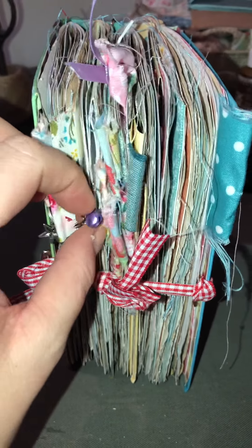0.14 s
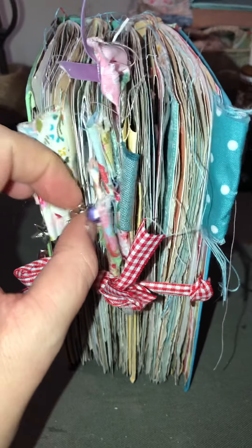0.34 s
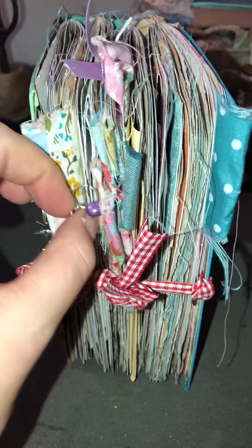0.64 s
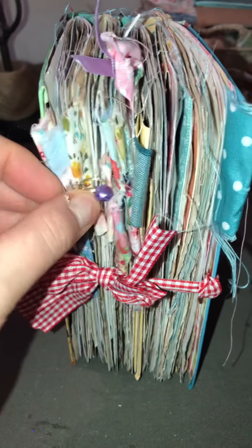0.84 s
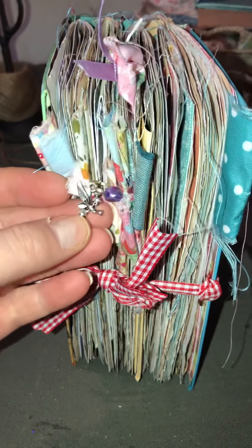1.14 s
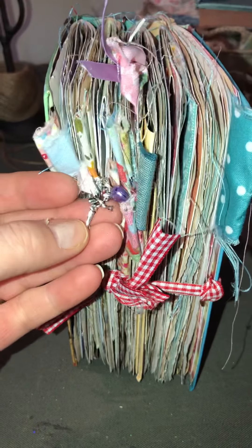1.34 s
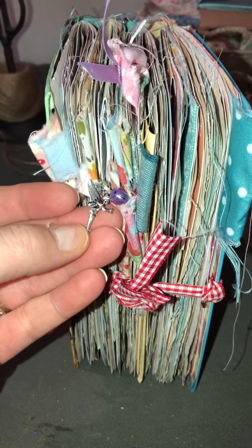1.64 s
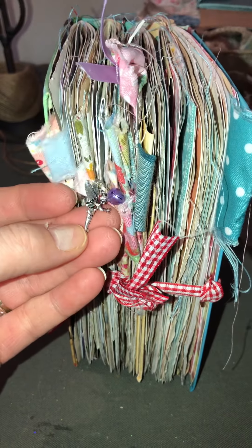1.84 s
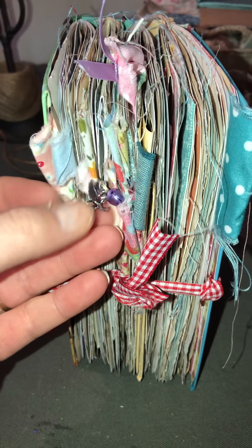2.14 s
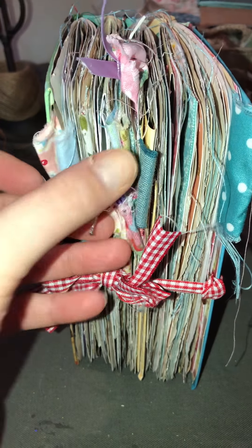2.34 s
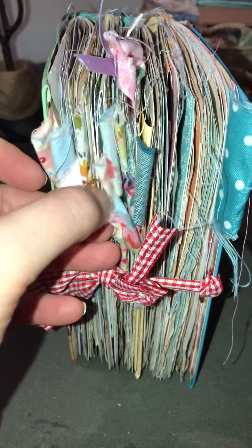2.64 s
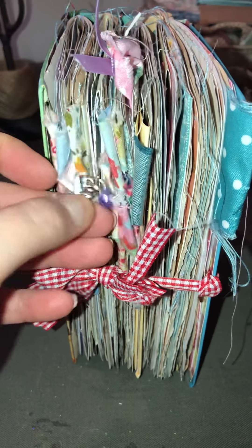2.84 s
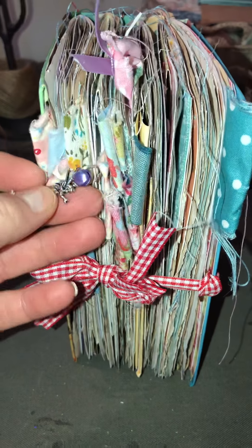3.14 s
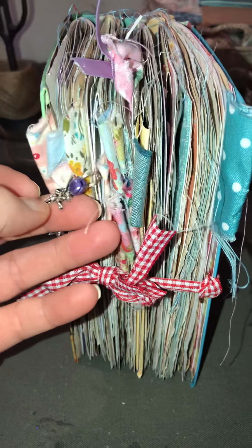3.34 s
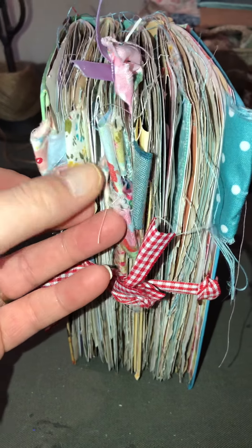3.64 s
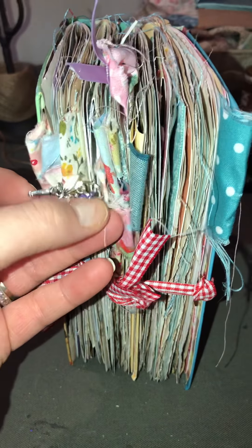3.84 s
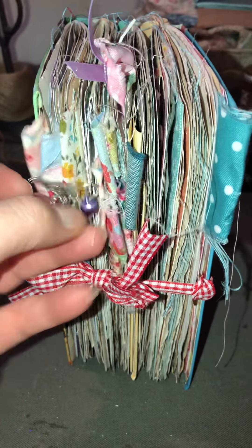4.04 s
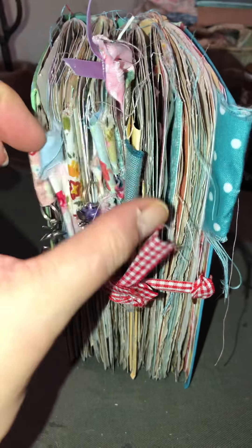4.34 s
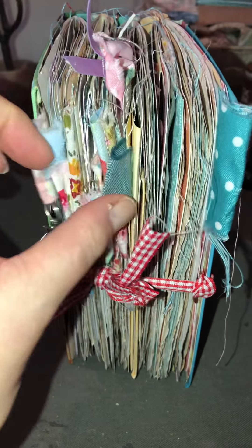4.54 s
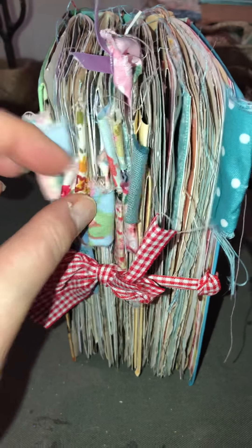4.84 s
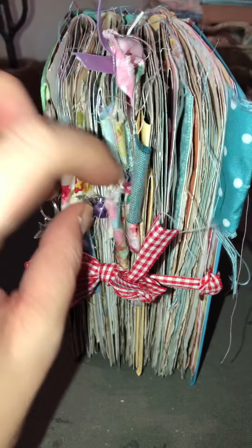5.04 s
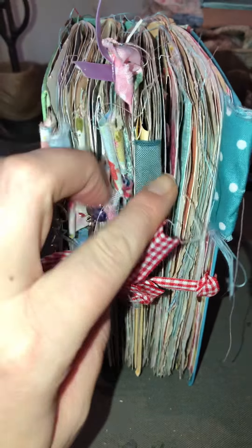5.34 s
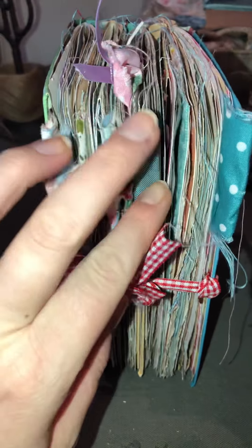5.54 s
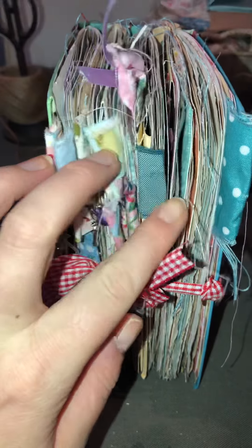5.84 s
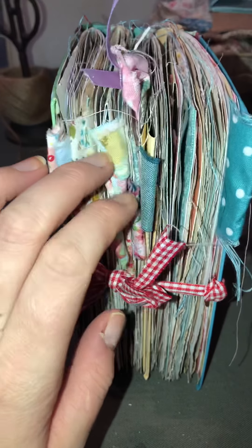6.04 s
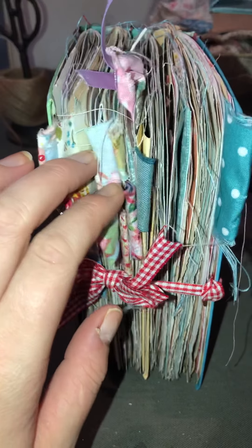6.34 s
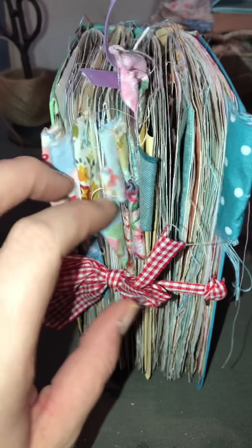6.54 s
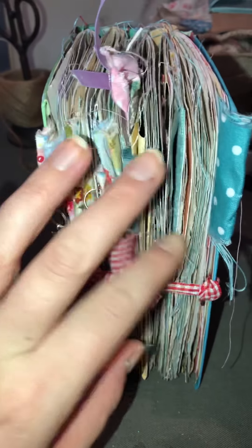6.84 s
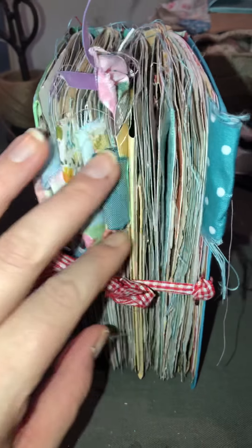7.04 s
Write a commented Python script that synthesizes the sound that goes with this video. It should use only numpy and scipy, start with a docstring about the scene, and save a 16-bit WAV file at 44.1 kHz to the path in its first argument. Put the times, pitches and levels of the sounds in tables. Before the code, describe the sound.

Very high, short, dry metallic ticks from a pellet in a tiny bell, clustered irregularly, mixed with small nail and charm taps and soft grainy rubbing of fabric and paper. Busiest in the middle, sparse towards the end, where finger strokes and bumps on thick pages take over. Close microphone, small dry indoor space, low room hum, faint steady whine, a brief low drone near the end.

```python
"""Fingers handle a tiny jingle bell and metal charms tied to the cloth tabs of a thick paper journal.
From the start a quiet room hums and an appliance whines faintly (noise and wavering sines), and fingertips
rustle on cloth and paper (grainy noise). At 0.2 s the pellet starts ticking in the bell (short damped sines),
then nails and charms tap (sines falling in pitch, with a crack). A nail slides along a ribbon near 2.2 s,
the bell is busiest from 2.6 to 4.4 s, soft pushes on the pages start at 4.4 s, and a low drone swells at 6.2 s.
"""
import sys
import numpy as np
from scipy import signal
from scipy.fft import rfft, irfft, next_fast_len
from scipy.io import wavfile
from scipy.ndimage import uniform_filter1d, map_coordinates

SR = 44100
rng = np.random.default_rng(int(sys.argv[2]) if len(sys.argv) > 2 else 0)


def digitize_waveform(pressure):
    """Quantize a signal to 16-bit integers and store it at the path in sys.argv[1].

    Rows of a 2-D input are taken as channels; values are limited to [-1, 1].
    """
    field = np.atleast_2d(pressure).T
    bounded = np.clip(field, -1, 1)
    quanta = np.round(bounded * 32767).astype(np.int16)
    wavfile.write(sys.argv[1], SR, quanta)


N = 316638  # length in samples, about 7.2 s

# Tone colour of the room's air noise: (pitch [Hz], relative level [dB])
AIR_COLOUR = [(18, -36.5), (38, -5.5), (85, -4), (140, 0), (223, 0.5), (302, -2.5), (360, -5), (836, -12.5),
              (1340, -17), (2740, -26.5), (8700, -28.5), (9050, -22.5), (9400, -35.5), (16000, -29)]
AIR_DB = -66.5  # rms level, before a slight wobble
# Steady hum and whine: (pitch [Hz], rms level [dB], depth of waver [dB])
HUM_TONES = [(100, -74, 2.5), (161.8, -78, 7), (199.4, -77.5, 6.5), (243.9, -75.5, 1.5), (296.5, -77.5, 3),
             (588.5, -85, 1), (636.7, -71, 0.9), (687, -83, -2)]
# Swell of a low drone near 160 Hz: (time [s], level [dB])
DRONE_SWELL = [(5.75, -80), (5.95, -67), (6.2, -64), (6.45, -66.5), (6.6, -76)]

# Fingertips stroking cloth and paper:
# (loudest time [s], top level of dull part [dB], swell [s], fade [s], bright part against dull part [dB])
FINGER_STROKES = [(.02, -70, .05, 0.074, -6.5), (.181, -76, 0.062, 0.94, 4.5), (.48, -64, 0.034, 0.035, -7),
                  (.527, -67, 0.07, 0.053, -3), (.707, -70, 0.083, .2, 2), (.857, -68, 0.11, 0.59, -1.5),
                  (2.16, -85, 0.019, 0.1, 8), (2.262, -64, 0.076, 0.024, 1), (2.31, -71.5, .05, .15, -6),
                  (2.7, -71.5, 0.4, 0.097, 2), (2.979, -66, 0.22, .08, -4.5), (3.077, -64, 0.036, 0.034, 4),
                  (3.166, -70, 0.081, 0.29, -9), (4.047, -73.5, 0.032, 0.9, -3),
                  (4.21, -73, .1, 0.088, 8.5), (4.243, -60.5, 0.0075, .025, 2), (4.831, -66, 0.16, .03, 3),
                  (5.046, -69, 0.17, 0.046, 2), (5.301, -68, 0.13, 0.55, -1.5),
                  (5.6, -73, 0.21, 0.37, -8.5), (5.8606, -52, 0.0097, .002, 4),
                  (5.892, -67.5, .02, .04, 0.5), (5.914, -71.5, .04, .015, 3), (6.199, -69.5, 0.4, 0.2, -3),
                  (6.483, -58.5, 0.011, .02, 9.5), (6.502, -53, 0.0126, 0.0167, 9),
                  (6.606, -71, 0.28, 0.073, -1.5), (7.17, -71, 0.38, 0.12, -1)]
STROKE_DROP_DB = 15  # how far a stroke lies below its top one swell time before or one fade time after
RESTING_DB = -81  # fingers that merely rest on the cloth
# Tone colour of the dull part of the rubbing: (pitch [Hz], relative level [dB])
DULL_COLOUR = [(300, -15), (600, -3.5), (1500, -3), (3000, -7.5), (4500, -15.5), (7000, -48.5)]
# Tone colour of the bright part of the rubbing: (pitch [Hz], relative level [dB])
BRIGHT_COLOUR = [(2000, -17), (4000, -5), (6000, -3.5), (9000, -6.5), (12000, -7.5), (16000, -14.5)]
# A nail slides along a ribbon: (time [s], level [dB])
RIBBON_SWISH = [(2.17, -97), (2.2, -71), (2.24, -72), (2.268, -82), (2.28, -93)]
SWISH_HZ, SWISH_WIDTH_HZ = 5680, 860

# Pellet strikes in the bell: (time [s], peak level [dB])
PELLET_STRIKES = [(.189, -44.5), (.1978, -50), (0.2089, -18.5), (0.215, -33), (.2435, -27.5),
                  (0.274, -30.5), (.278, -47.5), (.303, -37.5), (.331, -38.5), (.345, -41), (.375, -35.5),
                  (0.3877, -42), (.42, -44), (.427, -43), (0.438, -44.5), (0.4696, -49), (0.498, -54.5),
                  (.6947, -50), (0.7009, -34.5), (0.721, -37), (.7333, -43), (.7516, -47), (.7555, -46),
                  (.7766, -41), (.786, -44), (.818, -47), (0.8756, -35.5), (.8794, -31.5), (0.891, -49),
                  (0.904, -46), (.913, -47), (.9504, -40.5), (1.049, -49), (1.0565, -51), (1.0838, -52),
                  (1.2875, -44), (1.3636, -49.5), (1.3949, -53), (2.607, -52), (2.6224, -30),
                  (2.6649, -44.5), (2.679, -35), (2.6867, -34), (2.702, -35), (2.753, -25.5),
                  (2.7702, -33.5), (2.7833, -34), (2.7902, -22.5), (2.798, -34), (2.8315, -40),
                  (2.8991, -51.5), (2.94, -41), (2.9617, -24.5), (2.9688, -18), (2.975, -40),
                  (2.982, -20.5), (3.0035, -21.5), (3.029, -49.5), (3.037, -41), (3.0437, -40.5),
                  (3.056, -39), (3.0803, -31.5), (3.0836, -34), (3.0917, -38), (3.105, -38.5),
                  (3.1173, -37.5), (3.1556, -28), (3.166, -23.5), (3.18, -27.5), (3.198, -37),
                  (3.2127, -51), (3.27, -53), (3.2832, -42), (3.2943, -42.5), (3.3711, -35), (3.41, -64),
                  (3.436, -54), (3.449, -48), (3.479, -54), (3.5, -64), (3.508, -62.5), (3.6141, -55),
                  (3.733, -44), (3.7358, -46.5), (4.0402, -21.5), (4.0456, -26), (4.049, -24.5),
                  (4.0574, -34), (4.0803, -22), (4.0888, -31.5), (4.098, -34.5), (4.107, -43),
                  (4.1255, -34), (4.1712, -34), (4.1889, -37), (4.206, -30), (4.2183, -19), (4.221, -25.5),
                  (4.232, -33.5), (4.2396, -23), (4.2472, -20), (4.255, -33), (4.2825, -33.5),
                  (4.2935, -35), (4.3123, -30.5), (4.319, -35), (4.3705, -28), (4.3943, -34), (4.474, -52),
                  (4.724, -40), (4.937, -56), (5.049, -29.5), (5.053, -26), (5.0595, -37), (5.0748, -23),
                  (5.1007, -41), (5.139, -43), (5.164, -35), (5.1775, -45), (5.2047, -44.5), (5.218, -52),
                  (5.2496, -51), (6.058, -57), (6.077, -57), (6.263, -38.5), (6.2704, -46), (6.3026, -52),
                  (6.3235, -52), (6.3785, -57), (6.3918, -58), (6.516, -32), (6.5351, -50), (6.5396, -38.5),
                  (6.601, -55)]
# Moments when the bell hangs free and rings on: (start [s], end [s], starting level [dB])
FREE_RINGING = [(0.215, 0.25, -35), (0.241, 0.28, -61), (0.711, 0.72, -48), (0.778, .85, -52),
                (2.768, 2.805, -32.5), (2.8, 2.815, -58), (3.122, 3.155, -50), (4.08, 4.09, -47),
                (4.099, 4.133, -43), (4.22, 4.25, -39), (4.258, 4.276, -46)]
# Shakes that keep the pellet rolling: (start [s], end [s], level at start [dB], level at end [dB])
BELL_SHAKES = [(0.169, 0.51, -66, -76), (0.689, 1.45, -66, -88), (2.159, 2.193, -74, -72),
               (2.6, 3.52, -65, -74.5), (2.903, 2.973, -76, -45.5), (3.6, 3.802, -77.5, -71),
               (4.037, 4.602, -52, -79), (4.713, 4.851, -85, -66), (5.045, 5.296, -70, -79.5),
               (6.256, 6.34, -57, -80)]
SHELL_HZ, SHELL_SPREAD_HZ = 11770, 240  # the shell's pitch, and its random spread from blow to blow
FREE_HZ = 11560  # the mode that outlasts the others
STRIKE_T60_S, BOUNCE_T60_S, CLICK_T60_S = 0.011, 0.014, 0.006  # times to fade by 60 dB
# Small bounces after a strike: level below the loudest strike, dB gained per dB of strike, 60 dB fade
BOUNCE_BELOW_DB, BOUNCE_GROWS, SETTLE_S = -24, 0.88, 0.13

# Taps of nails and charms on cloth and card: (time [s], knock peak [dB], final pitch [Hz], 60 dB fade [s])
HARD_TAPS = [(0.3451, -43.5, 3480, 0.00094), (0.4525, -37.5, 3220, 0.0029), (0.697, -28, 3550, 0.0022),
             (1.2282, -46, 1740, 0.0033), (2.16, -59, 14500, 0.0036), (2.622, -52, 5060, 0.0033),
             (2.758, -51.5, 900, 0.012), (3.0727, -51.5, 2480, 0.004), (3.081, -43.5, 5750, 0.0025),
             (3.157, -52, 4020, 0.0027), (3.167, -47.5, 4500, 0.0019), (3.178, -52, 2480, 0.0026),
             (3.212, -53.5, 1320, 0.0067), (3.3263, -55, 3450, 0.003), (3.371, -52, 5960, 0.0023),
             (3.831, -53.5, 5780, 0.0014), (3.8415, -44.5, 13700, 0.0021), (3.874, -40, 13720, 0.0016),
             (4.014, -52, 13770, 0.0022), (4.043, -35, 5100, 0.0007), (4.044, -54, 1730, .006),
             (4.2408, -49, 1900, .005), (5.047, -40.5, 7140, 0.0022), (5.862, -32, 1110, 0.0072),
             (6.2813, -50.5, 4200, 0.0031), (6.483, -41, 2900, 0.005), (6.498, -44, 3470, 0.0041),
             (6.506, -37.5, 6960, 0.00443), (6.5066, -46, 1380, 0.0051), (6.597, -55, 5940, .003),
             (6.608, -50, 1310, 0.0034)]
CRACK_BELOW, CRACK_ABOVE = 0.6, 4  # edges of the crack's band, as multiples of the tap's pitch
# Soft pushes on the block of pages: (time [s], starting level [dB], pitch [Hz], 60 dB fade [s])
PAGE_PUSHES = [(4.413, -48, 277, 0.077), (4.43, -52, 233, 0.13), (4.455, -64, 253, 0.14),
               (5.866, -43, 284, 0.022), (6.045, -51.5, 278, 0.2), (6.952, -54, 274, 0.15)]

WALLS_DB = -18  # strength of the table's and room's answer
FADE_HZ, TOP_HZ = 15850, 16700  # where the last treble starts to fade, and where it stops


def amp(db):
    """Turns decibels into a gain."""
    return 10 ** (np.asarray(db) / 20)


def unit(x):
    """Scales a sound to rms 1."""
    return x / np.sqrt(np.mean(x ** 2) + 1e-20)


def curve(rows, column=1):
    """Draws one table column as a value per sample; silent outside the rows."""
    rows = np.array(rows)
    return np.interp(np.arange(N) / SR, rows[:, 0], rows[:, column], left=-150, right=-150)


def wobble(rate):
    """A smooth random curve through a given number of random points a second."""
    points = rng.standard_normal(int(N * rate / SR) + 4)
    return map_coordinates(points, [np.arange(N) * rate / SR])


def filtered(x, response):
    """Changes the strength of each frequency in x by a response curve."""
    m = next_fast_len(N + 8192)
    return irfft(rfft(x, m) * response(np.fft.rfftfreq(m, 1 / SR)), m)[:N]


def coloured(x, spectrum):
    """Gives x the tone colour of a (Hz, dB) table, at rms 1."""
    f, db = np.transpose(spectrum)
    return unit(filtered(x, lambda hz: amp(np.interp(np.log(hz + 1), np.log(f + 1), db))))


def ring(t, hz, t60, attack):
    """A sine that starts softly and fades by 60 dB in t60 seconds, as a struck object does."""
    return np.sin(2 * np.pi * hz * t) * amp(-60 * t / t60) * (1 - np.exp(-t / attack))


def add(track, s, sound):
    """Mixes a sound into the track at time s."""
    part = track[round(s * SR):][:len(sound)]
    part += sound[:len(part)]


def wavering_tone(hz, waver_db):
    """A sine whose level and phase drift at random, at rms 1."""
    t = np.arange(N) / SR
    level = amp(waver_db * wobble(13))
    return unit(level * np.sin(2 * np.pi * hz * t + 0.16 * waver_db * wobble(12)))


def room():
    """Air noise, wavering hum and whine lines, and a passing low drone."""
    air = amp(AIR_DB + 1.1 * wobble(2.71)) * coloured(rng.standard_normal(N), AIR_COLOUR)
    hum = sum(amp(db) * wavering_tone(hz, waver_db) for hz, db, waver_db in HUM_TONES)
    drone = amp(curve(DRONE_SWELL)) * wavering_tone(160, 1.3)
    return air + hum + drone


def distance_from_peak(s, rise, fall):
    """How far a swell is from its top at time s: 1 one rise time before it, 1 one fall time after."""
    t = np.arange(N) / SR - s
    return np.maximum(-t / rise, t / fall)


def fingers():
    """Friction: grainy noise as fibres catch and let go; a dull part, a bright part and a narrow swish."""
    grains = amp(1.2 * wobble(40) + 2.24 * wobble(500)) * rng.standard_normal(N)
    swish = unit(filtered(grains, lambda hz: 1 / (1 + (2 * (hz - SWISH_HZ) / SWISH_WIDTH_HZ) ** 2)))
    # Strokes overlap, so their powers are summed
    dull_power = amp(RESTING_DB) ** 2
    bright_power = amp(RESTING_DB) ** 2
    for s, db, rise, fall, brightness_db in FINGER_STROKES:
        power = amp(db - STROKE_DROP_DB * distance_from_peak(s, rise, fall)) ** 2
        dull_power = dull_power + power
        bright_power = bright_power + power * amp(brightness_db) ** 2
    dull = np.sqrt(dull_power) * coloured(grains, DULL_COLOUR)
    bright = np.sqrt(bright_power) * coloured(grains, BRIGHT_COLOUR)
    return dull + bright + amp(curve(RIBBON_SWISH)) * swish


def strike(db, hz, t60):
    """One pellet blow: two close shell modes beat against each other, with side modes and a click."""
    t = np.arange(SR // 40) / SR
    luck = rng.standard_normal(6)
    # The cosine splits the pitch into a close pair, about 75 Hz to either side
    body = ring(t, hz, t60, 0.00013) * np.cos(2 * np.pi * 75 * amp(0.99 * luck[5]) * t)
    body += amp(-15.5 + 2.8 * luck[0]) * ring(t, hz * (1.125 + 0.026 * luck[1]), 0.0075, 0.00052)
    body += amp(-23 + 3 * luck[2]) * ring(t, hz * (0.9 + 0.027 * luck[3]), 0.011, 0.00099)
    # Noise a few kHz wide, moved up to just above the shell's pitch
    noise = uniform_filter1d(rng.standard_normal(len(t)), size=4)
    edge = noise * np.sin(2 * np.pi * 1.06 * hz * t)
    click_db = -25.5 - 0.23 * db + 3 * luck[4]  # light blows are more click, less ring
    click = amp(click_db - 60 * t / CLICK_T60_S) * edge
    return amp(db) * (body + click)


def pellet_blows():
    """The separate strikes of the pellet on the shell, each set to its peak level."""
    out = np.zeros(N)
    for (s, db), luck in zip(PELLET_STRIKES, rng.standard_normal(len(PELLET_STRIKES))):
        blow = strike(db, SHELL_HZ + SHELL_SPREAD_HZ * luck, STRIKE_T60_S)
        add(out, s, amp(db) * blow / np.abs(blow).max())
    return out


def free_ringing():
    """One long-lasting mode rings while the bell hangs free, until the next touch damps it."""
    out, t = np.zeros(N), np.arange(SR // 8) / SR
    for s, end, db in FREE_RINGING:
        since_touch = np.maximum(t - (end - s), 0)
        add(out, s, amp(db - 60 * since_touch / 0.0069) * ring(t, FREE_HZ, 0.16, 0.001))
    return out


def small_bounces():
    """Many tiny blows at random times, heard as the pellet settles after a strike or rolls in a shake."""
    bounces = np.zeros(N)
    for s, size, pitch in rng.random((1400, 3)):
        db = -45 - 4 * np.log(size + 0.021)
        hz = SHELL_HZ + 4 * SHELL_SPREAD_HZ * (pitch - 0.5)
        add(bounces, s * N / SR, strike(db, hz, BOUNCE_T60_S))
    # Each strike stirs up bounce power that then dies away
    stir, lag = np.zeros(N), np.arange(SR // 4) / SR
    s, db = np.transpose(PELLET_STRIKES)
    stir_db = BOUNCE_BELOW_DB + db.max() + BOUNCE_GROWS * (db - db.max())
    stir[np.round(s * SR).astype(int)] = amp(stir_db) ** 2
    settling = signal.fftconvolve(stir, amp(-60 * lag / SETTLE_S) ** 2)[:N]
    rolling = sum(amp(curve([(s, a), (end, b)])) ** 2 for s, end, a, b in BELL_SHAKES)
    return unit(bounces) * np.sqrt(np.abs(settling) + rolling)


def bell():
    """The pellet's blows, the shell's free ringing and the small bounces together."""
    return pellet_blows() + free_ringing() + small_bounces()


def taps():
    """Short dry knocks whose pitch drops as the contact spreads, each with a crack of noise."""
    out, t = np.zeros(N), np.arange(SR // 8) / SR
    for s, db, hz, t60 in HARD_TAPS:
        # Cycles so far: the pitch starts nearly 1500 Hz high and settles at once
        cycles = hz * t + 1500 * 0.000079 * (1 - np.exp(-t / 0.000081))
        knock = np.sin(2 * np.pi * cycles) * amp(-60 * t / t60) * (1 - np.exp(-t / 0.00014))
        edges = [CRACK_BELOW * hz, min(CRACK_ABOVE * hz, SR / 2 - 1000)]
        band = signal.butter(2, edges, "bandpass", fs=SR)
        noise = unit(signal.lfilter(*band, rng.standard_normal(len(t))))
        crack = amp(-17.5 - 60 * t / 0.011) * noise
        add(out, s, amp(db) * (knock + crack) / np.abs(knock).max())
    return out


def pushes():
    """Low damped tones as fingers push the block of pages."""
    out, t = np.zeros(N), np.arange(SR // 8) / SR
    for s, db, hz, t60 in PAGE_PUSHES:
        add(out, s, amp(db) * ring(t, hz, t60, 0.00033))
    return out


def walls(x):
    """A short answer from the table and the room: x smeared by a quickly fading burst of noise."""
    t = np.arange(SR // 5) / SR
    tail = rng.standard_normal(len(t)) * amp(-60 * t / 0.036) * (t > 0.002)
    return signal.fftconvolve(x, tail / np.linalg.norm(tail))[:N]


def scene():
    """All sources at one microphone; only bell, taps and pushes get the answer of the walls."""
    near = bell() + taps() + pushes()
    return (room() + fingers() + near + amp(WALLS_DB) * walls(near))[None]


def record(dry):
    """The phone fades the last treble and keeps nothing above its band limit."""
    def response(hz):
        fade_db = np.where(hz > FADE_HZ, -10 - 0.012 * (hz - FADE_HZ), 0)  # a 10 dB step, then a slope
        return amp(fade_db) * (hz < TOP_HZ)
    return filtered(dry[0], response)[None]


dry = scene()
out = record(dry)
digitize_waveform(out)
```